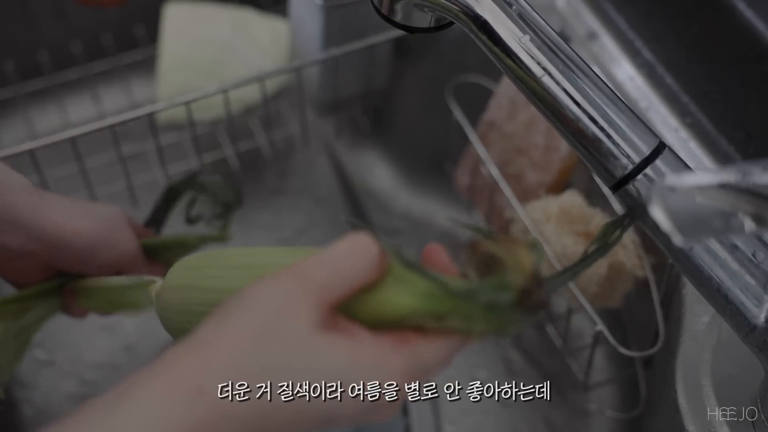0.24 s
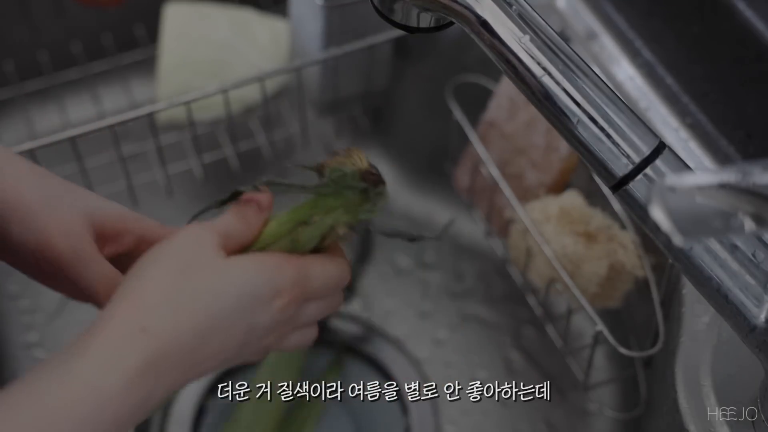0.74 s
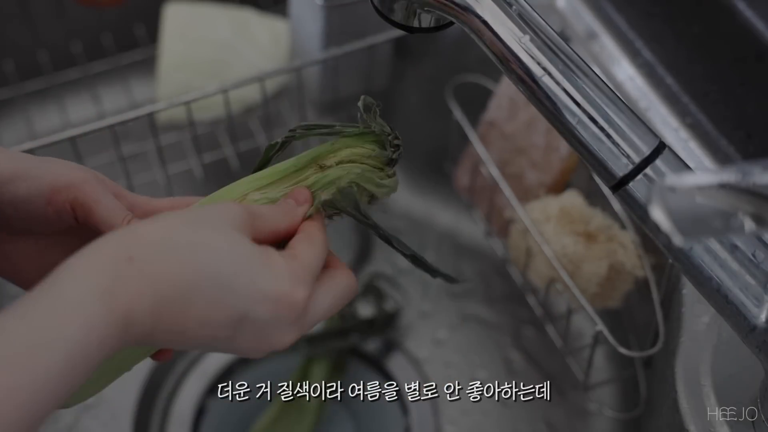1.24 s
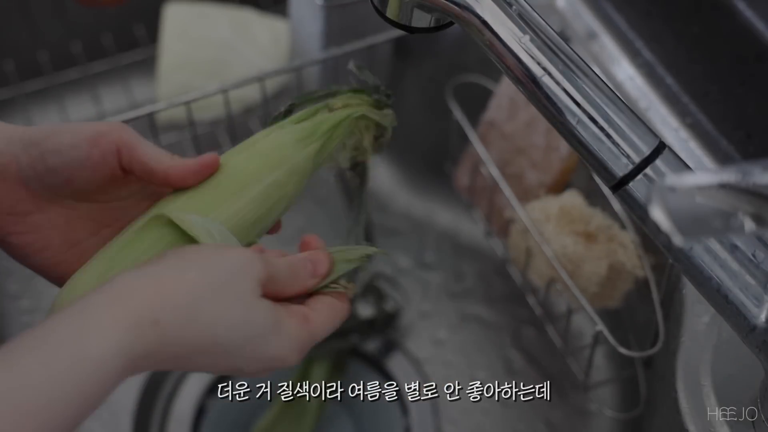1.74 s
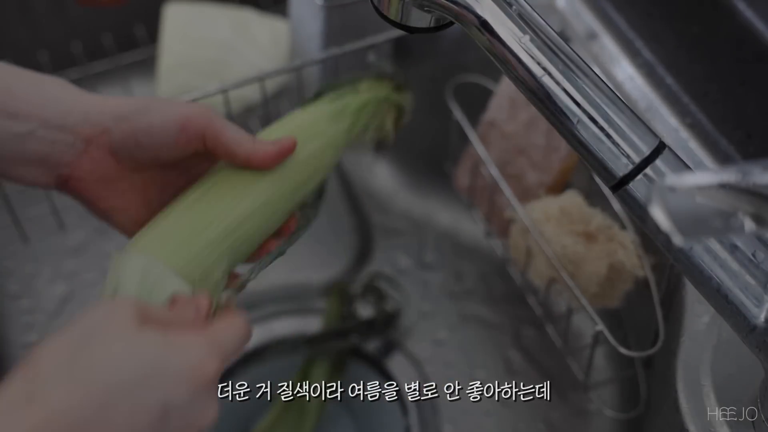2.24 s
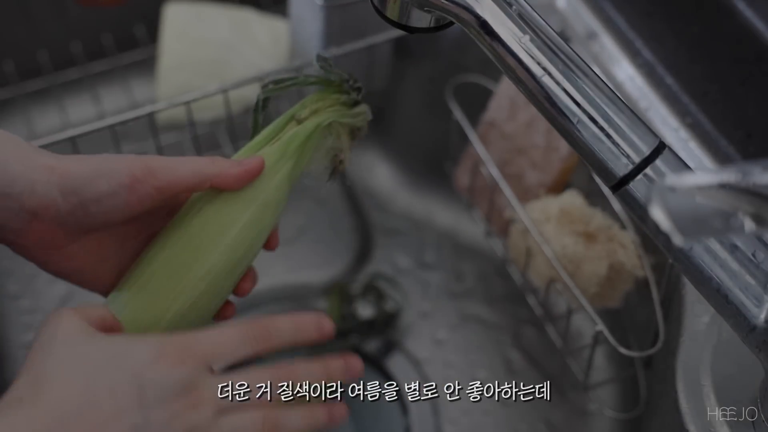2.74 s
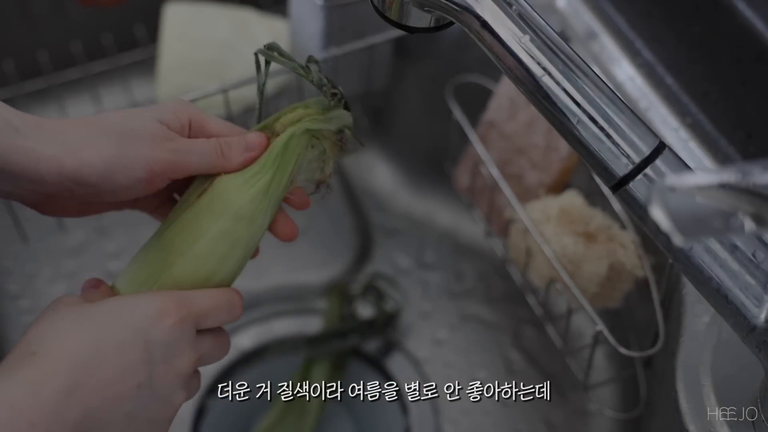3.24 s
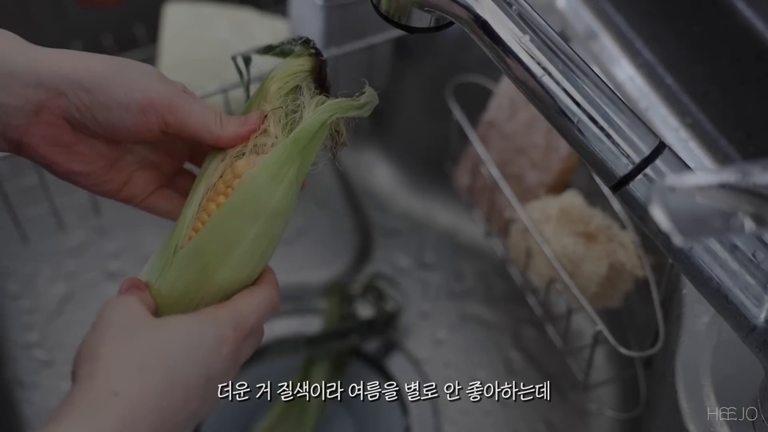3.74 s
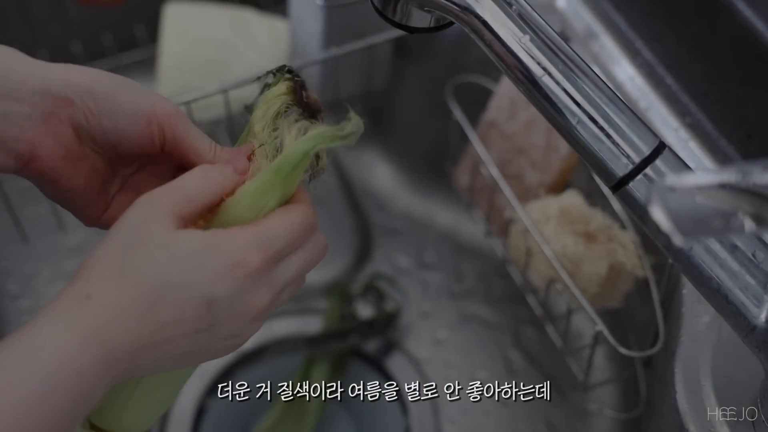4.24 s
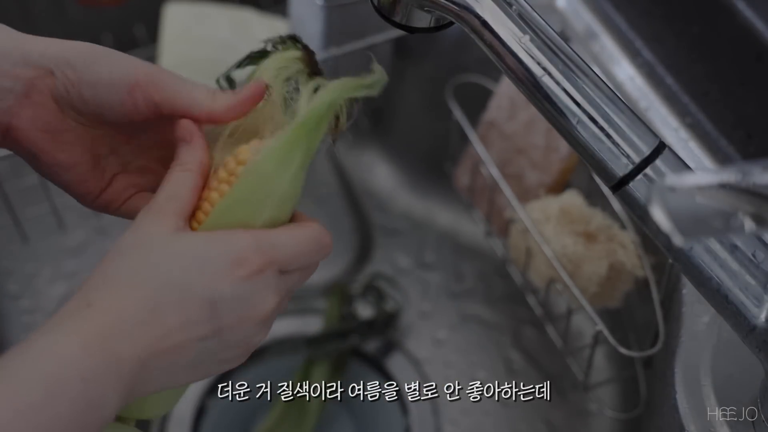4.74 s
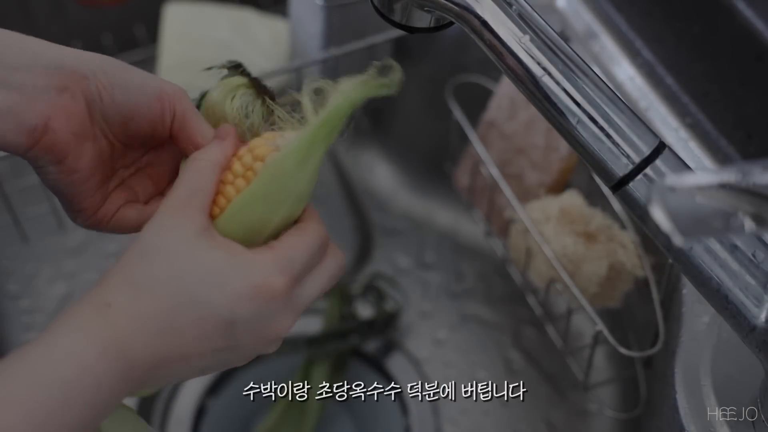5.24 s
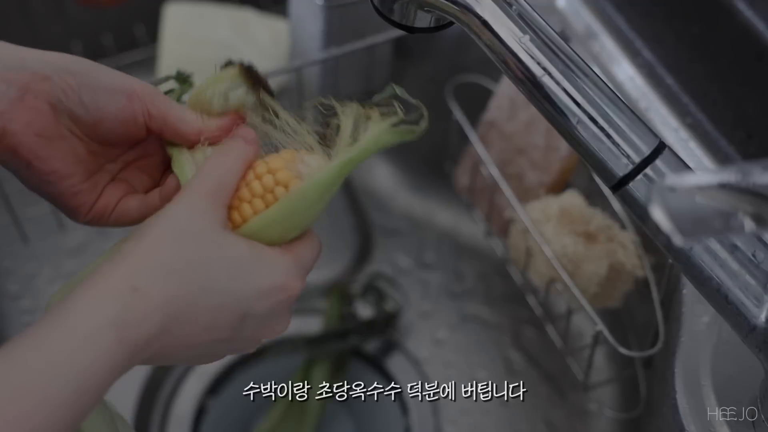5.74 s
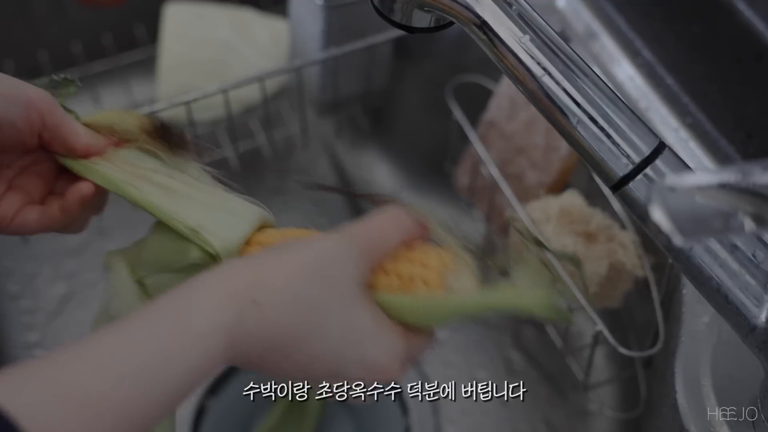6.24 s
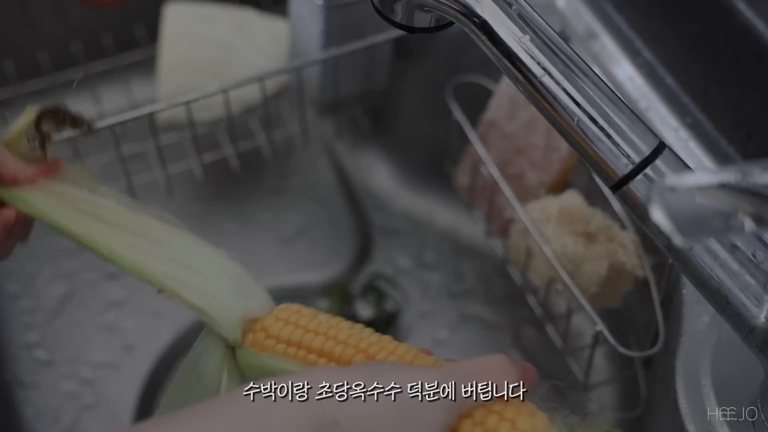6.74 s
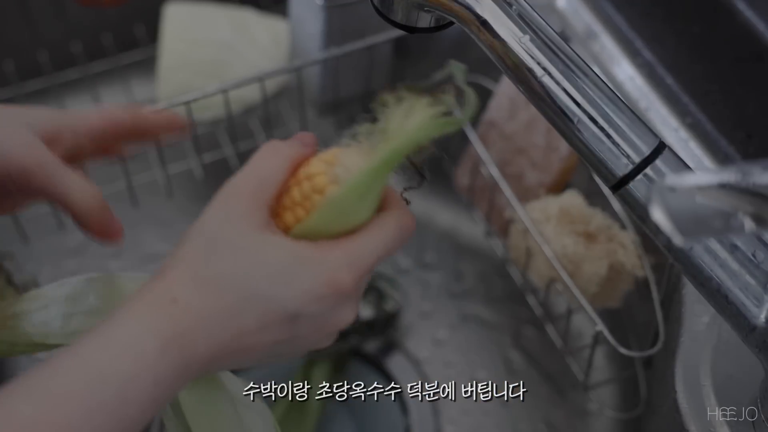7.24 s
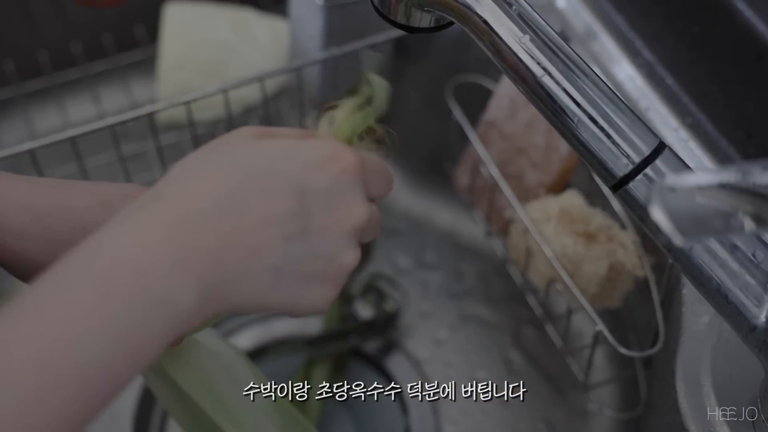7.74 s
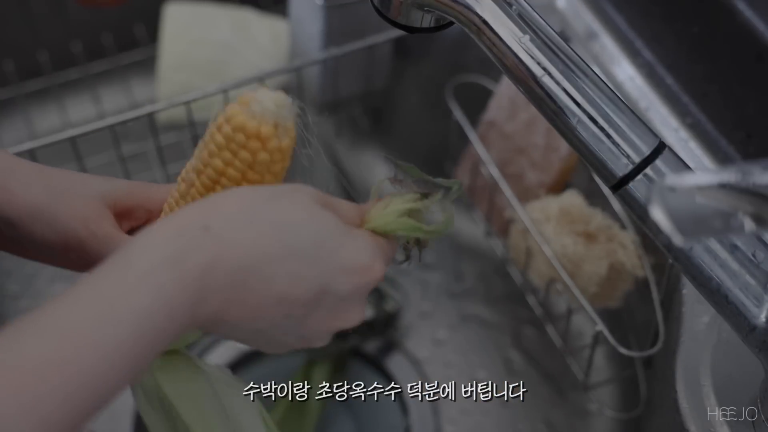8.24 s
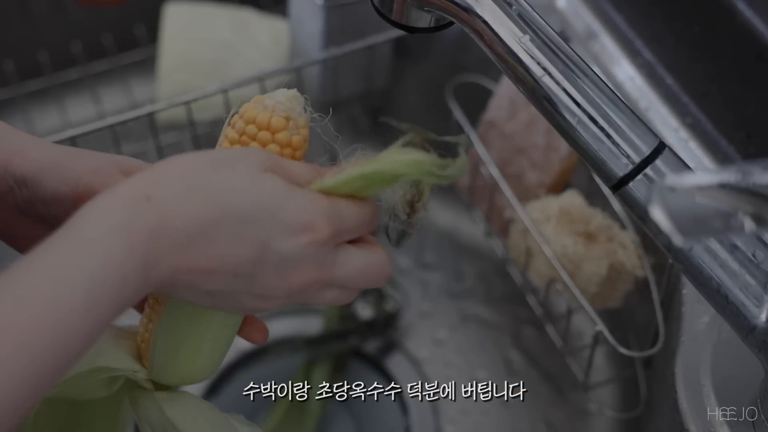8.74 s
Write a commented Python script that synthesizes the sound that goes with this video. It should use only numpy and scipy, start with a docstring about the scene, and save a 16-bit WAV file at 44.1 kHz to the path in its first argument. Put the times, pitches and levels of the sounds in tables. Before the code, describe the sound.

Hands husk a corn cob close to a small microphone above a steel sink. Crisp rips, squeaky leaf rubs and sharp snaps come early, with soft hollow bumps on the basin. It nearly pauses around three seconds, thickens again after four, bursts into the loudest tear near six and a half, then thins to light rustling over quiet room hiss.

```python
"""Nine seconds of husking a corn cob over a steel kitchen sink, with a small microphone close by.
A quiet kitchen hisses and drones throughout. Tears come in from the first moments, pause around 3 s, return
sparsely from about 3.6 s and more thickly after 4.2 s, are loudest near 6.5 s and then thin out. Leaves are
banded noise grain shaped by strokes and tears, with added clicks; now and then a bump, a filtered noise knock,
sets decaying sines humming in the basin."""
import sys
import numpy as np
from scipy import signal
from scipy.fft import rfft, irfft, next_fast_len
from scipy.io import wavfile
from scipy.ndimage import uniform_filter1d

SR = 44100
rng = np.random.default_rng(int(sys.argv[2]) if len(sys.argv) > 2 else 0)


def store_pcm(level_fs):
    """Save levels as 16-bit WAV."""
    pcm = np.round(np.clip(level_fs, -1, 1) * 32767).astype(np.int16)
    wavfile.write(sys.argv[1], SR, np.atleast_2d(pcm).T)


N = 396018


def gain_of(db):
    """Amplitude factor of a level in dB."""
    return 10 ** (np.asarray(db) / 20)


def evened(x):
    """Scales a sound to an rms of 1."""
    return x / np.sqrt(np.mean(x ** 2) + 1e-20)


def read(points, hz):
    """Reads a curve of (Hz, value) points along a logarithmic frequency axis."""
    f, value = np.transpose(points)
    return np.interp(np.log(hz + 1), np.log(f + 1), value)


def add(mix, s, sound):
    """Adds a sound into the mix from s seconds on, cut at the end of the mix."""
    part = mix[..., round(s * SR):][..., :sound.shape[-1]]
    part += sound[..., :part.shape[-1]]


def filtered(x, order, hz, kind):
    """Butterworth filter with its edge or edges in Hz."""
    return signal.sosfilt(signal.butter(order, hz, kind, fs=SR, output="sos"), x)


def patchy(x, spectrum, patchy_db, size):
    """Colours x and lays smooth random patches over time and frequency; rms 1."""
    hz, t, z = signal.stft(x, SR, nperseg=size)
    patches = rng.standard_normal(z.shape)
    patches = uniform_filter1d(patches, size=6, axis=0)
    patches = evened(uniform_filter1d(patches, size=8, axis=1))
    level_db = read(spectrum, hz)[:, None] + patchy_db * patches
    return evened(signal.istft(z * gain_of(level_db), SR, nperseg=size)[1][:N])


def ringing(modes, t):
    """Resonances as sines that die away exponentially, one row for each (Hz, dB, t60 s)."""
    return np.array([gain_of(db - 60 * t / t60) * np.sin(2 * np.pi * hz * t) for hz, db, t60 in modes])


def kitchen():
    """Steady coloured noise as hiss, and a distant narrow band of low noise as a wavering drone."""
    # Colour of the hiss. Each row: frequency in Hz, relative level in dB per Hz.
    room_colour = [(15, 9), (32, 8.5), (60, 1), (100, 6), (250, 6), (760, 1.5), (1260, -1.5), (2200, -3),
                   (7100, -4.5), (8650, -5), (10200, -6), (13200, -7.5), (16000, -15)]
    # Distant low drone. Each row: time in seconds, level in dB.
    drone_levels = [(0.0, -74), (0.75, -64.5), (1.9, -81), (3.25, -74.5), (3.6, -78.5), (6.95, -70.5),
                    (8.98, -68)]
    hiss = gain_of(-64.5) * patchy(rng.standard_normal(N), room_colour, patchy_db=2.5, size=2048)
    drone = evened(filtered(rng.standard_normal(N), 2, [52, 80], "bandpass"))
    drone_db = np.interp(np.arange(N) / SR, *np.transpose(drone_levels))
    return hiss + drone * gain_of(drone_db)


def echoes(x):
    """Sparse taps of random sign from basin walls and tiles, each band dying at its own speed."""
    # Kitchen tail. Each row: frequency in Hz, t60 in seconds.
    tail_times = [(300, 0.2), (2000, 0.17), (8000, 0.078), (16000, 0.033)]
    taps = np.zeros(SR // 2)
    at = np.arange(100, len(taps) - 20, 20)
    taps[at + rng.integers(0, 20, len(at))] = rng.choice([-1., 1.], len(at))
    hz, t, z = signal.stft(taps, SR, nperseg=256)
    fading = gain_of(-60 * t / read(tail_times, hz)[:, None])
    tail = signal.istft(z * fading, SR, nperseg=256)[1]
    return signal.fftconvolve(x, tail / np.linalg.norm(tail))[:N]


def bumps():
    """A short hollow knock that sets the walls and the floor of the basin ringing."""
    # Bumps on the basin. Each row: start in seconds, knock peak in dB, knock pitch in Hz, knock t60 in
    # seconds, wall ringing in dB and floor boom in dB, both relative to the knock.
    bump_rows = [(0.075, -35.5, 546, 0.09, -19, -15), (.36, -44.5, 250, 0.083, -24, -13),
                 (.415, -49.5, 200, 0.092, -7.5, 0.5), (0.509, -38.5, 604, 0.052, -3.5, 1.5),
                 (.532, -31, 520, 0.41, -6.5, -6), (.69, -47, 300, .08, -10, -13),
                 (2.288, -43, 302, 0.089, -2.5, -27), (2.309, -31.5, 398, 0.088, -15.5, -29.5),
                 (2.422, -47, 630, 0.077, -10, -31), (2.51, -47.5, 250, 0.096, -16, -23),
                 (2.649, -50, 199, 0.16, -17, -15), (2.733, -40, 360, 0.041, -21, -25),
                 (3.414, -47.5, 448, 0.13, -24, -28), (4.004, -54.5, 260, 0.09, -6.5, -13),
                 (4.201, -50.5, 600, 0.052, -15, -25), (5.019, -49.5, 450, 0.19, -15, -25),
                 (6.089, -43, 300, 0.095, -17, -22), (6.469, -50, 300, 0.071, -20, -9),
                 (7.179, -58, 240, 0.088, 0, -17), (7.281, -38.5, 283, 0.28, -8, -16.5),
                 (7.549, -60, 200, .08, -11, 4.5), (8.646, -49.5, 344, 0.091, -19, -29)]
    # Ringing of the steel walls, then of the floor. Each row: frequency in Hz, relative level in dB, t60 in s.
    wall_modes = [(201.4, -5, 0.29), (234.8, -2.5, 0.53), (265.3, -2, 0.62), (359.4, -7, 0.49),
                  (472, -8, 0.46), (583, -8, 0.66), (634, -5, 0.3), (705, -11, 0.24), (790, -18, .2)]
    floor_modes = [(101, 4.5, 0.39), (137.6, -12, 1.5)]
    out, t = np.zeros(N), np.arange(2 * SR) / SR
    walls, floor = ringing(wall_modes, t), ringing(floor_modes, t).sum(0)
    short = t[:8000]
    for s, db, hz, t60, walls_db, floor_db in bump_rows:
        chance = rng.standard_normal(len(short))
        contact = 1.5 * np.exp(-short / 0.00031)
        rattle = chance * gain_of(-60 * short / t60)
        knock = filtered(contact + rattle, 2, [hz / 1.74, hz * 1.45], "bandpass")
        knock /= abs(knock).max()
        sound = gain_of(walls_db + 2.0 * chance[:len(walls)]) @ walls  # each spot favours other modes
        sound += gain_of(floor_db) * floor
        sound *= 1 - np.exp(-t / 0.0028)  # soft contact
        add(sound, 0, knock)
        add(out, s, gain_of(db) * sound)
    return filtered(out, 2, 75, "highpass")  # a small basin radiates no deep bass


def fibres(per_s, spread_db, slips_per_s, slip_db, slip_s, hiss):
    """Tiny fibre breaks of uneven size over a sliding hiss, in small sudden slips; four bands, each of rms 1."""
    # Colour of the leaves up close. Each row: frequency in Hz, relative level in dB per Hz.
    leaf_colour = [(120, -54), (200, -9), (232, -12), (347, -11.5), (409, -14), (456, -11), (696, -6.5),
                   (836, -5.5), (1450, -6), (1560, -2.5), (7010, -2.5), (8740, 1.5), (10100, -3.5),
                   (14100, 3.5), (16000, -8)]
    # Edges between cob body, leaf flap, crackle and fibre fizz. Each entry: frequency in Hz.
    band_edges = [1200, 3500, 9500]
    slips = gain_of(slip_db * np.minimum(rng.exponential(1, N), 3))
    slips = slips * (rng.random(N) < slips_per_s / SR)
    clumps = 1.6 + signal.lfilter([1], [1, -np.exp(-1 / (slip_s * SR))], slips)  # sudden start, slower fade
    sizes = gain_of(spread_db * np.minimum(rng.exponential(1, N), 4)) * rng.standard_normal(N)
    breaks = evened(sizes * (rng.random(N) < per_s / SR))
    grain = np.sqrt(clumps) * (breaks + hiss * rng.standard_normal(N))
    grain /= np.sqrt(uniform_filter1d(clumps, size=3000))  # slips redistribute the energy, not add to it
    grain = patchy(grain, leaf_colour, patchy_db=2.0, size=256)
    size = next_fast_len(N)
    z, hz = rfft(grain, size), np.fft.rfftfreq(size, 1 / SR) + 1
    below = [1 / (1 + (hz / edge) ** 8) for edge in band_edges]
    shares = np.diff([0 * hz, *below, 0 * hz + 1], axis=0)
    return np.array([evened(irfft(z * share, size)[:N]) for share in shares])


def colour(db, colour_db, dull_db):
    """Power in the four bands: a dull stroke or tear favours the lower ones."""
    # Share of the dullness that each band gains, in order: cob body, leaf flap, crackle, fibre fizz.
    dulling = np.array([1.25, 0.82, 0.049, -.2])
    return gain_of(2 * (db + np.array(colour_db) + dull_db * dulling))[:, None]


def ticks():
    """A vein breaks with a very short click, then a short rattle of the freed leaf."""
    # One vein of a leaf breaks. Each row: start in seconds, peak level in dB, pitch in Hz.
    tick_rows = [(0.101, -24, 8210), (0.1212, -13.5, 8170), (0.144, -11.5, 8300), (0.3545, -21.5, 8770),
                 (0.6778, -29, 2510), (1.035, -30, 8300), (1.355, -28, 2400), (1.4957, -19, 2330),
                 (1.7279, -33, 7670), (1.7604, -21, 7840), (2.0685, -38.5, 6970), (2.137, -20, 8260),
                 (2.291, -22, 5120), (2.4252, -33, 2980), (2.4444, -22, 5620), (2.51, -28, 5600),
                 (3.389, -39, 5020), (3.47, -38, 7870), (3.626, -36, 8880), (3.6412, -26.5, 2680),
                 (3.7155, -38, 2030), (4.2706, -34, 5430), (4.3228, -19.5, 5430), (4.3924, -33, 5550),
                 (4.5016, -13.5, 2780), (4.51, -20, 8600), (4.5128, -20, 3380), (4.9387, -38, 5370),
                 (5.085, -30, 5730), (5.1015, -27, 5540), (5.1567, -27, 3390), (5.1842, -23, 8680),
                 (5.19, -16, 3860), (5.2026, -26, 8470), (5.21, -19.5, 2030), (5.228, -22, 2180),
                 (5.2436, -17.5, 2430), (5.2618, -20.5, 2050), (5.3396, -25, 2160), (5.3673, -24, 2160),
                 (5.381, -28, 8560), (5.3941, -26.5, 1990), (5.412, -32, 2200), (5.43, -27, 8350),
                 (5.4434, -35, 8980), (5.461, -34, 8510), (5.71, -38, 8590), (5.7275, -33, 8600),
                 (6.0367, -34, 1940), (6.093, -24, 8550), (6.2993, -40, 3430), (6.322, -41, 2740),
                 (6.3522, -23, 2750), (6.408, -18, 8700), (6.466, -8.5, 2030), (6.4763, -8, 8800),
                 (6.4915, -20, 7880), (6.5064, -13, 1790), (6.906, -46, 1800), (6.741, -43, 8600),
                 (6.9677, -36, 2870), (7.9683, -37, 7650), (8.013, -39, 2270), (8.077, -37, 8600),
                 (8.108, -41, 6440), (8.543, -34, 8590)]
    out, t = np.zeros(N), np.arange(3000) / SR
    shape = np.exp(-t / 0.00015) + gain_of(-12.5 - 60 * t / 0.088)
    for s, db, hz in tick_rows:
        burst = shape * rng.standard_normal(len(t))
        click = filtered(burst, 1, [hz / 1.36, hz * 1.42], "bandpass")
        click += 0.21 * np.diff(burst, prepend=0)  # some bright edge
        add(out, s, gain_of(db) * click / abs(click).max())
    return out


def strokes():
    """Power in four bands: each pull or rub swells, holds and fades; their powers add."""
    # One pull or rub of the leaves. Each row: start of the peak in seconds, crackle in dB, swell in seconds,
    # hold in seconds, fade in seconds, dullness in dB.
    stroke_rows = [(0.0, -41.5, .05, 0.0021, 0.065, -3), (0.113, -32, 0.054, 0.0021, 0.079, -0.5),
                   (0.344, -50.5, 0.28, 0.032, 0.16, 3), (.5, -37, 0.04, 0.03, 0.098, -3),
                   (0.676, -43, 0.021, 0.011, 0.063, 7.5), (0.825, -58, .1, 0.018, 0.17, 4),
                   (.97, -52, 0.15, 0.0023, 0.081, 0), (1.061, -61, 0.089, 0.051, .15, 6),
                   (1.276, -41, 0.077, 0.027, 0.093, -0.5), (1.41, -57.5, .05, 0.01, .05, 8),
                   (1.501, -45, 0.023, 0.071, 0.067, -0.5), (1.724, -43, 0.051, .02, 0.17, -15),
                   (1.82, -39, 0.14, 0, 0.14, -2.5), (2.054, -59, 0.091, 0.08, .2, -2),
                   (2.222, -43, 0.075, .05, .1, -5), (2.3, -39.5, 0.093, 0, .07, 7),
                   (2.398, -37, 0.38, 0.078, 0.037, 1.5), (2.654, -43.5, 0.29, 0.016, 0.044, -1),
                   (2.792, -48.5, 0.099, 0.055, 0.062, 0.5), (2.999, -55, 0.07, 0.0072, .1, 2),
                   (3.106, -48.5, 0.063, 0.042, 0.11, -4), (3.247, -63.5, .1, .03, 0.12, 2.5),
                   (3.354, -56, 0.039, 0.018, .06, -3), (3.423, -53.5, .04, 0.046, .1, -1),
                   (3.577, -48.5, .12, 0.012, .08, -3.5), (3.634, -48.5, 0.057, 0.066, 0.071, 0.5),
                   (3.82, -64, 0.055, .02, .05, 2), (3.963, -54.5, .1, 0.004, 0.26, -2.5),
                   (4.131, -51.5, 0.19, 0.018, 0.083, 2.5), (4.262, -57, .02, 0.0038, .05, -1),
                   (4.319, -44.5, .05, 0.0027, 0.095, -5.5), (4.447, -39, 0.049, 0.0019, 0.092, -4),
                   (4.53, -36, 0.094, 0.005, 0.047, 1), (4.7, -51, 0.31, 0, .18, -3.5),
                   (4.8, -49.5, 0.043, 0, .035, 1), (5.05, -52.5, 0.16, 0, 0.073, 3),
                   (5.102, -51, 0.028, 0.11, .05, 5), (5.198, -41, .04, 0.037, 0.19, -5),
                   (5.377, -46, 0.24, 0.074, 0.069, 0.5), (5.548, -53.5, .2, 0.089, 0.085, 4),
                   (5.729, -51, 0.07, 0, 0.051, 2), (5.924, -47, 0.1, 0, .1, 0),
                   (5.973, -41.5, 0.075, 0.0013, .1, -1), (6.049, -33.5, 0.085, 0.049, 0.068, 1.5),
                   (6.208, -57, 0.13, 0.0017, .12, 1), (6.31, -43, 0.02, 0.11, .05, 2),
                   (6.399, -28, 0.021, 0.052, .1, 0), (6.474, -19.5, 0.11, .025, 0.023, 2),
                   (6.55, -47, 0.046, .01, .14, 3), (6.72, -64, 0.19, 0.022, 0.059, 9),
                   (7.021, -48, 0.19, 0.0014, .2, -1), (7.193, -53, 0.25, 0.021, 0.11, -2),
                   (7.28, -48.5, .08, 0, 0.073, 1), (7.39, -55, 0.19, 0, 0.47, -2),
                   (7.601, -49, .11, 0.017, 0.14, -1.5), (7.69, -61.5, .03, 0.026, 0.15, -6),
                   (7.824, -59.5, 0.083, 0.0029, 0.14, -0.5), (7.919, -61.5, 0.21, .1, 0.12, 1.5),
                   (8.21, -41, 0.11, .02, 0.083, 3), (8.531, -52.5, 0.43, 0.011, 0.085, 0),
                   (8.29, -50, .02, 0, 0.043, -13), (8.66, -58, 0.17, 0, 0.094, 3),
                   (8.76, -55.5, 0.088, 0, 0.11, 3), (8.88, -62.5, 0.11, 0.086, .1, 2)]
    # Colour of a rub. Each entry: relative dB, in order cob body, leaf flap, crackle, fibre fizz.
    rub_colour = [-14.5, -7, -0.5, -9.5]
    range_db = 20  # a swell climbs and a fade drops this far in its given time
    t, out = np.arange(N) / SR, np.zeros((4, N))
    for s, db, swell, hold, fade, dull_db in stroke_rows:
        near = slice(max(round((s - 3 * swell) * SR), 0), round((s + hold + 3 * fade) * SR))
        before = np.maximum((s - t[near]) / swell, 0)
        after = np.maximum((t[near] - s - hold) / fade, 0)
        out[:, near] += colour(db, rub_colour, dull_db) * gain_of(-2 * range_db * (before + after))
    return out


def tears():
    """A leaf sticks, then tears loose: band powers, the hush in dB before it, and the curled leaf's resonance."""
    # A leaf tears loose. Each row: start in seconds, nominal peak in dB, dullness in dB, t60 in seconds,
    # resonance in Hz.
    snap_rows = [(0.101, -20, -4, .11, 8210), (0.123, -11, -9, 0.098, 8300), (.295, -21, 6.5, 0.16, 8310),
                 (0.3308, -23.5, 11, 0.11, 4910), (.3541, -12, 6, 0.073, 8700), (.4934, -22, -5, .11, 6580),
                 (0.668, -20.5, 7, 0.13, 2230), (0.806, -33.5, 10.5, 0.2, 3810),
                 (1.4896, -9.5, 4, 0.18, 2320), (1.658, -28.5, -8, 0.098, 3920),
                 (1.7255, -14, -29, 0.086, 7670), (1.76, -15.5, 3, 0.1, 7900),
                 (1.997, -15.5, -4, 0.12, 7850), (2.068, -19.5, -24, 0.089, 6980),
                 (2.1357, -23, -8, 0.091, 8600), (2.2023, -24, 11, .1, 2850),
                 (2.2903, -18, 10, 0.081, 5140), (2.345, -20, -5, .14, 5840), (2.4234, -27, 3, .11, 2980),
                 (2.5108, -13.5, 4.5, 0.077, 5700), (2.647, -20, 5, 0.066, 2460),
                 (3.6262, -29, -7, .089, 8880), (3.714, -21, -8, 0.058, 2070),
                 (4.2056, -30, 13, 0.14, 1060), (4.321, -16, -7, 0.062, 5430),
                 (4.3906, -30.5, -1, 0.074, 5550), (4.4345, -10, -12, 0.13, 3320),
                 (4.5103, -5.5, 3, 0.063, 8700), (4.64, -34, 12.5, 0.15, 8300), (4.794, -32, 2, .11, 1000),
                 (4.9392, -32.5, 8, 0.083, 5370), (5.022, -26, 8.5, 0.17, 5100),
                 (5.124, -21.5, 3, 0.19, 8370), (5.156, -18, -2, .07, 3400),
                 (5.1832, -12.5, -1, 0.16, 2170), (5.34, -18.5, 4, 0.094, 2120),
                 (5.367, -15, -8, 0.066, 2150), (5.463, -19.5, 0, 0.16, 8300), (5.522, -22, 6, 0.076, 8900),
                 (5.9458, -18.5, 1, 0.23, 1040), (6.3202, -15.5, 6, 0.1, 2830),
                 (6.3513, -20, 15, .12, 2780), (6.401, -5.5, -5, 0.18, 3200), (6.444, -3, 4, 0.12, 7680),
                 (6.4662, -8, -7, .12, 2010), (6.477, 2.5, -3, 0.12, 8670), (6.4902, -9, -5, .11, 7900),
                 (6.506, -10, 0, .12, 1780), (6.905, -19, 3.5, 0.11, 1770), (7.444, -37.5, 15, 0.34, 2070),
                 (8.098, -29.5, 6, .11, 6180), (8.157, -23, 10, 0.21, 2320),
                 (8.543, -19.5, -8, 0.062, 8590)]
    # Colour of a tear. Each entry: relative dB, in order cob body, leaf flap, crackle, fibre fizz.
    tear_colour = [-21, -8, -1, -7.5]
    crest_db = 22.5  # nominal peak of a tear over its rms
    power, hush_db, hollow = np.zeros((4, N)), np.zeros(N), np.zeros(N)
    t = np.arange(8000) / SR
    hush = -6.0 * np.exp(-t[:2000][::-1] / 0.019)
    for s, db, dull_db, t60, hz in snap_rows:
        rms_db = db - crest_db
        dying = gain_of(-120 * t / t60) * (1 - np.exp(-35 * t / t60))  # power; long tears start more slowly
        add(power, s, colour(rms_db, tear_colour, dull_db) * dying)
        add(hush_db, s - 2000 / SR, hush)  # the taut leaf sticks before it gives
        curl = evened(filtered(rng.standard_normal(len(t)), 1, [hz / 1.05, hz * 1.05], "bandpass"))
        add(hollow, s, gain_of(rms_db + 0.12 * dull_db - 3.0) * np.sqrt(dying) * curl)
    return power, hush_db, hollow


def husks():
    """The strokes and the sudden tears add their power, band by band, on the same fibres."""
    # Slow drift of the lowest and highest band. Each row: time in seconds, cob body in dB, fibre fizz in dB.
    drift_rows = [(0, 3.5, 6), (.6, 4.5, -4), (1.1, -3.5, 6), (1.6, 0, -3), (2.1, 1, 0), (2.7, 5.5, -0.5),
                  (3.3, -7.5, 1), (3.9, -6.5, 0.5), (4.3, 2.5, -5), (4.6, -13, -8), (5, 0.5, -4),
                  (5.6, -7, 0), (6, 0, -6.5), (6.4, -1.5, 4.5), (6.7, 5.5, -9), (7.2, 3, 6.5),
                  (7.802, 4.5, 1), (8.3, 1, -0.5), (8.98, -2, -2)]
    # Thin steel and stiff leaves ring with every crackle. Each row: frequency in Hz, relative dB, t60 in s.
    ring_modes = [(668, 13.5, 0.074), (1070, 4, 0.28), (1570, -2, 0.34), (1780, -4, 0.13),
                  (2175, -4.5, 0.3), (2376, 6, 0.28), (2883, 9, 0.038), (3340, -5, 0.16), (3980, 6, 0.27),
                  (4460, 0, 0.14), (5560, 14, 0.12), (7820, -16, 0.12), (9200, 0, 0.15)]
    tear_power, hush_db, hollow = tears()
    grain = fibres(per_s=8000, spread_db=1.6, slips_per_s=120, slip_db=3.8, slip_s=.006, hiss=1.2)
    s, body, fizz = np.transpose(drift_rows)
    drift = gain_of([np.interp(np.arange(N) / SR, s, db) for db in (body, 0 * s, 0 * s, fizz)])
    power = strokes() * gain_of(2 * hush_db) + tear_power
    leaves = (np.sqrt(power) * drift * grain).sum(0) + hollow + ticks()
    leaves = filtered(leaves, 2, 170, "highpass")  # leaves push no bass
    rings = ringing(ring_modes, np.arange(8000) / SR).sum(0)
    rung = signal.oaconvolve(leaves, rings / np.linalg.norm(rings))[:N]
    return leaves + gain_of(-21) * rung


def scene():
    """Husks and bumps close by, their echoes, and the kitchen behind; one channel."""
    near = husks() + bumps()
    return (near + gain_of(-13.5) * echoes(near) + kitchen())[None]


def record(dry):
    """The small microphone's band limit: a steep low-pass at 15900 Hz."""
    low_pass = signal.firwin(511, 15900, window=("kaiser", 9), fs=SR)
    return signal.oaconvolve(dry, low_pass[None], "same")


dry = scene()
out = record(dry)
store_pcm(out)
```